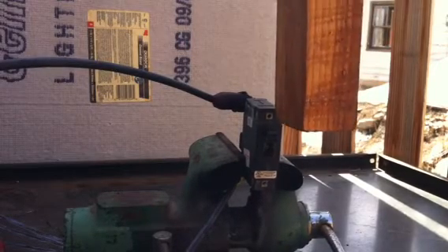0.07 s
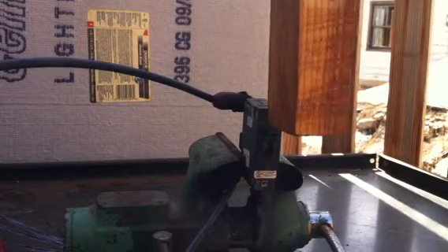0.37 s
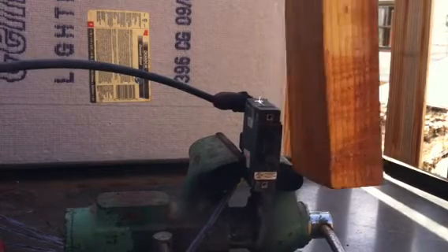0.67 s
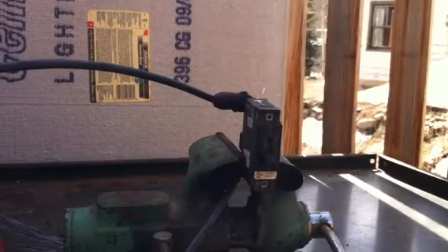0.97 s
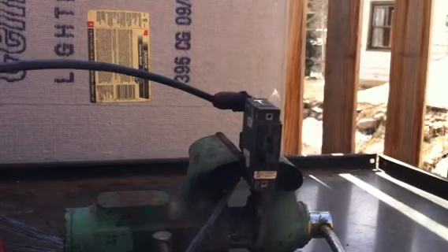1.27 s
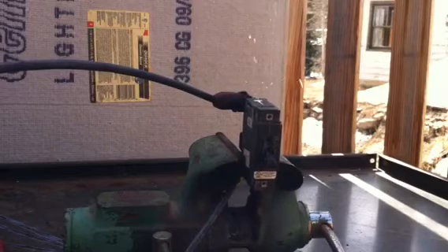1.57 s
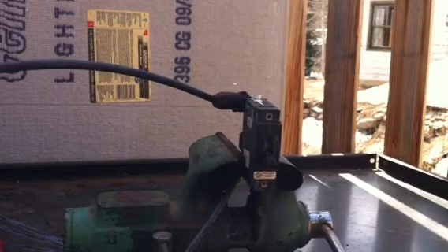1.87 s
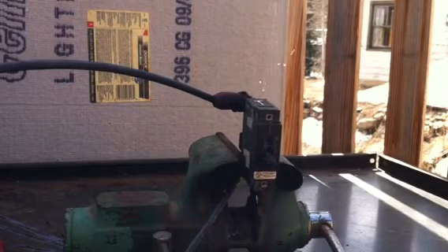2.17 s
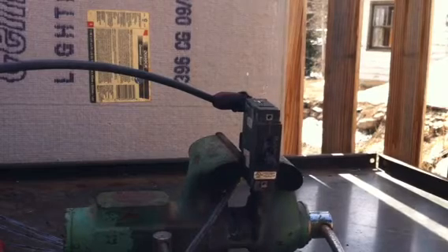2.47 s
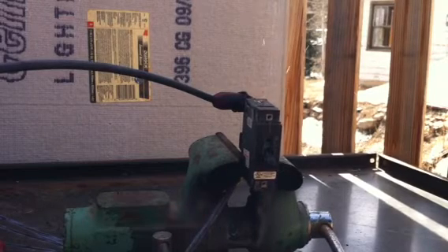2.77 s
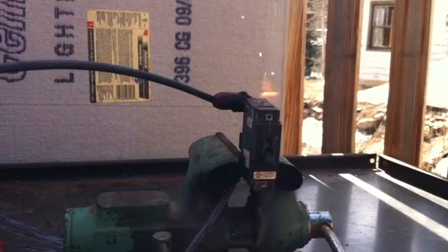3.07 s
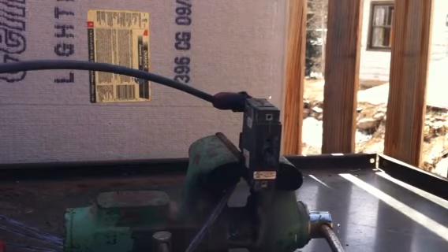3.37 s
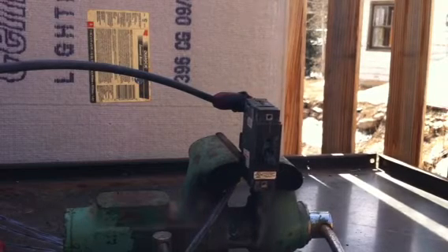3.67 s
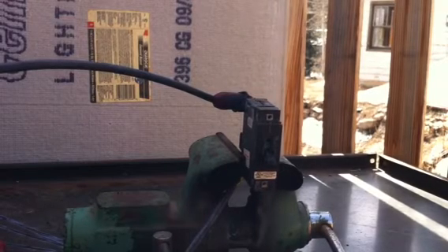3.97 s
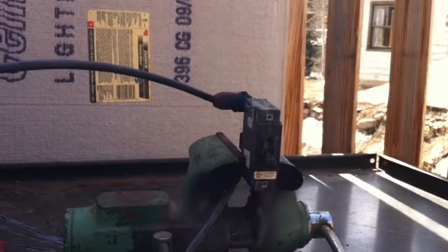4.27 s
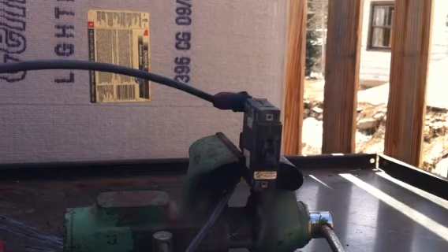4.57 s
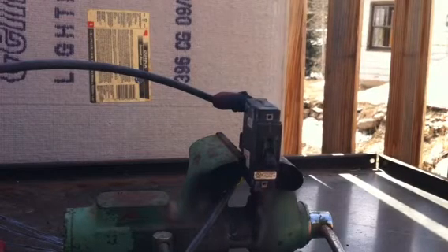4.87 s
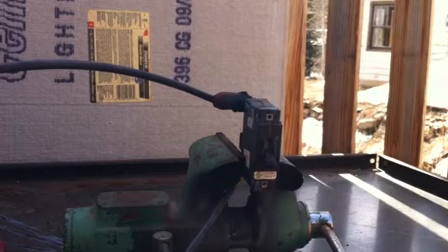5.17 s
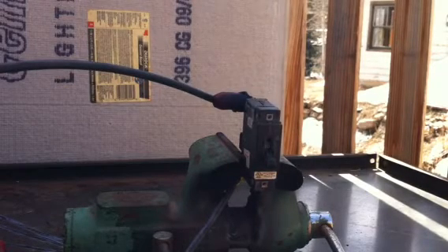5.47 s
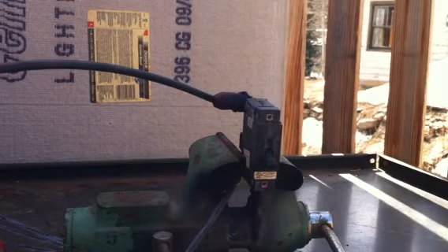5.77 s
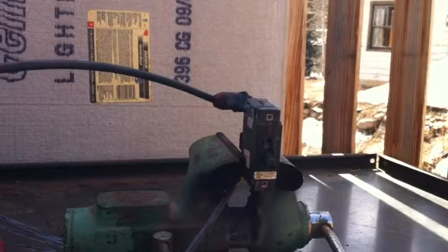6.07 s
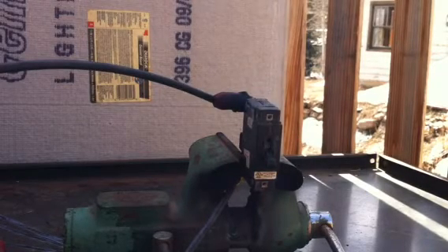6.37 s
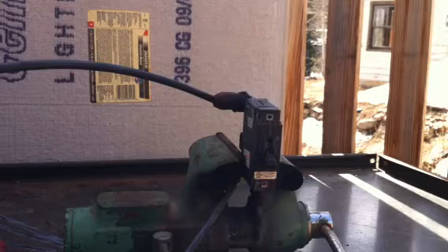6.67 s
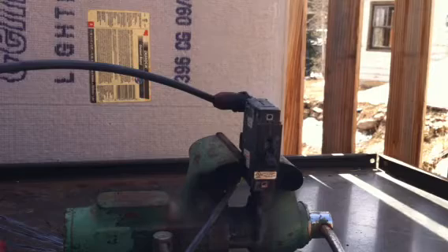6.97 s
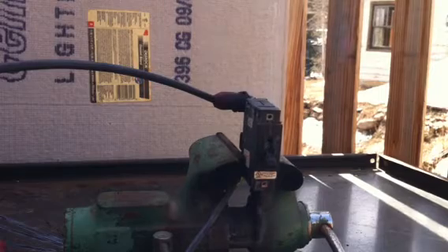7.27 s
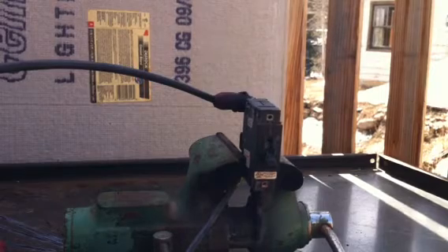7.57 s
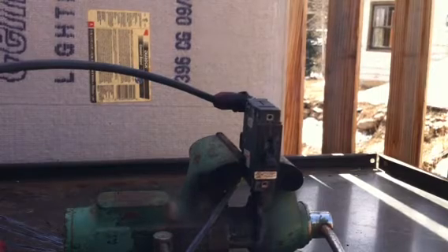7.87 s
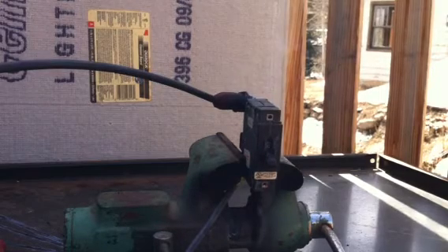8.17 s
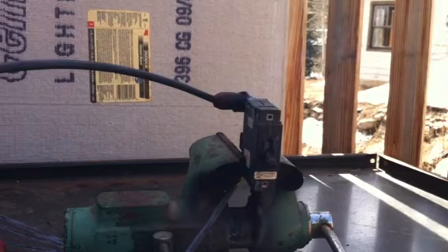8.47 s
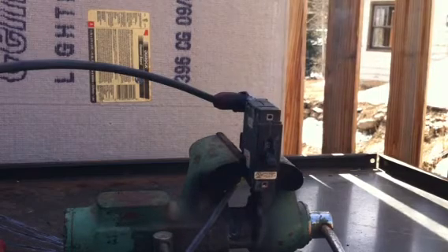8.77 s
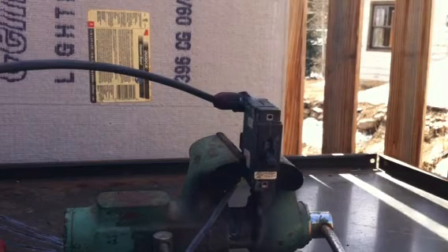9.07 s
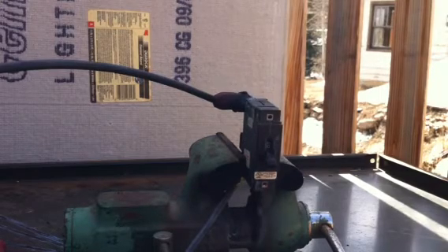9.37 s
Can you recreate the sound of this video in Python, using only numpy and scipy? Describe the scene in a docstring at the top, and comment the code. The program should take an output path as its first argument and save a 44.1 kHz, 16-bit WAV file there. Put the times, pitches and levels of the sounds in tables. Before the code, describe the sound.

An electric arc strikes inside a circuit breaker with a sharp crack and burns for a couple of seconds as a harsh, ringing hiss. It rises slightly in pitch, sputters louder and snaps out. A small puff of gas follows, then faint knocks on a workbench and a soft rustle of cloth. The sound is close, in a shed with quiet outdoor air behind it.

```python
"""On a workbench in a shed, a wooden block trips a circuit breaker and an electric arc burns inside it
for two and a half seconds. The arc's harsh hiss rings the breaker's chamber, whose pitch climbs as it
heats; the arc surges, snaps and goes out. Then come a short puff of gas, small knocks about the bench
and a soft rustle of cloth, over quiet outdoor air, far birds and a mains hum."""
import sys
import numpy as np
from scipy import signal
from scipy.fft import rfft, irfft
from scipy.io import wavfile

SR = 44100
rng = np.random.default_rng(int(sys.argv[2]) if len(sys.argv) > 2 else 0)


def put_to_file(sound):
    """Save the sound as 16-bit audio at rate SR, in the file named by the first command-line argument."""
    columns = np.atleast_2d(sound).T  # one column per channel
    safe = np.clip(columns, -1, 1)
    whole_steps = np.round(safe * 32767)
    wavfile.write(sys.argv[1], SR, whole_steps.astype(np.int16))


N = 419391
TIME = np.arange(N) / SR

ARC_ON_S, ARC_OFF_S = 0.72, 3.272
WILD_FROM_S, WILD_BY_S = 2.1, 2.8  # the contacts burn back and the arc turns unsteady
# strength of the arc between its flares (time [s], level [dB])
ARC_STRENGTH = [(0.762, -49.5), (0.79, -47.5), (1.2, -45.5), (1.272, -49), (1.342, -45), (1.4, -45.5),
                (1.48, -45.5), (2.1, -45.5), (2.46, -42), (2.53, -41.5), (2.56, -38.5), (3.25, -35.5)]
# moments when the arc nearly goes out and its hiss dips (time [s])
STALL_TIMES = [2.857, 3.024, 3.246]
# the chamber's lowest note, rising as its gas heats (time [s], pitch [Hz])
HEATED_PITCH = [(0.75, 1350), (0.95, 1385), (1.9, 1385), (2.4, 1425), (2.75, 1480), (3.06, 1570),
                (3.25, 1590)]
# notes the chamber rings at (base pitch [Hz], width [Hz], level [dB], share of the heat's rise [0-1])
CHAMBER_NOTES = [(1408, 108, 5, 0.99), (3472, 210, -0.5, 0.45), (5920, 350, -9, 0.76)]
# fixed notes of the breaker's case and the bench (pitch [Hz], width [Hz], level [dB])
CASE_NOTES = [(915, 65, -1.5), (1050, 120, -5.5), (1232, 35, 1.5), (2735, 70, -9), (2950, 60, -10),
              (3275, 70, 1)]
# tone of the arc's roar (frequency [Hz], level [dB])
ROAR_TONE = [(60, -21.5), (250, 4), (600, 3.5), (1100, 3.5), (2000, -3), (3000, 5), (4600, -7.5),
             (6500, -8), (7400, -26)]
# tone of the early sizzle (frequency [Hz], level [dB])
SIZZLE_TONE = [(3000, -38.5), (5000, -7), (5900, 7), (7400, -11.5), (8200, -1.5), (10000, -2), (11400, -3),
               (12800, 0.5), (15800, -9.5)]
# tone of the sizzle once the arc is wild (frequency [Hz], level [dB])
HOT_SIZZLE_TONE = [(3000, -3.5), (5400, -17.5), (6700, 5), (7800, -7.5), (9500, 1), (11500, 3.5),
                   (15800, 3)]
# whistles of the chamber (start [s], length [s], level [dB], pitch [Hz])
CHAMBER_WHISTLES = [(2.226, 0.036, -35.5, 1395), (2.395, 0.01, -30, 1420), (2.552, 0.014, -45, 1410),
                    (2.655, 0.025, -30, 1602), (2.697, 0.027, -30.5, 1416), (2.845, 0.091, -28, 1592),
                    (2.948, 0.014, -25.5, 1460), (3.036, 0.035, -20.5, 1570), (3.119, 0.023, -21, 1608),
                    (3.165, 0.012, -19, 1546), (3.195, 0.046, -26.5, 1630)]
# brief spits of crackle, most as the arc strikes (time [s], level [dB], fade [s])
ARC_SPITS = [(0.716, -22.5, 0.0027), (0.7209, -13, 0.0034), (0.725, -24.5, 0.0058), (0.774, -26.5, 0.011),
             (2.937, -20.5, 0.0015)]
# flares of the burning arc (start [s], length [s], level [dB])
ARC_FLARES = [(1.335, 0.029, -35.5), (1.862, 0.015, -33.5), (2.548, 0.035, -30), (2.776, 0.063, -26.5),
              (2.92, .026, -26.5), (2.97, 0.023, -23.5), (3.122, 0.035, -27.5), (3.155, 0.046, -24),
              (3.215, 0.014, -30), (3.252, 0.02, -22.5)]
# single sharp snaps (time [s], level [dB])
SHARP_SNAPS = [(0.7196, 0), (2.017, -11), (2.804, -8), (2.938, -2.5), (3.2675, 1.5), (3.8214, -23),
               (4.018, -32), (4.428, -34), (7.204, -26), (7.974, -22.5), (8.353, -20)]
# tone of spits, flares and snaps (frequency [Hz], level [dB])
SPARK_TONE = [(60, -19), (250, 2.5), (900, 7.5), (2200, 2), (3600, 4.5), (5200, 2), (7600, -0.5),
              (11000, 3), (15800, -0.5)]
# bands that cancel around the breaker (frequency [Hz], width [Hz], depth [0-1])
HOLLOW_BANDS = [(829, 40, 0.8), (1985, 220, 0.4), (2803, 73, 0.5), (4200, 69, 0.2), (4820, 110, .7),
                (7050, 140, .85), (7620, 56, 0.7)]
# pushes of hot gas (time [s], level [dB], centre [Hz], spread [octaves], fade [s])
GAS_WHUMPS = [(0.759, -33, 1050, 0.52, 0.01), (0.777, -33.5, 202, 0.53, 0.056),
              (0.798, -40, 139, 0.47, 0.14), (0.83, -37, 590, 0.98, 0.11), (2.466, -22, 270.4, 0.26, 0.012),
              (2.468, -25.5, 170, 0.19, 0.014), (2.79, -26.5, 1100, 0.66, 0.031),
              (2.934, -32, 233, 0.39, 0.0087), (2.937, -20.5, 3950, 0.18, 0.0031)]
# tone of the last puff of gas (frequency [Hz], level [dB])
PUFF_TONE = [(200, -19), (1700, -3), (2500, 7), (4000, 1), (9500, 2.5), (15800, 0)]

# knocks about the bench (time [s], level [dB], centre [Hz], spread [octaves], treble [dB])
BENCH_KNOCKS = [(0.283, -51, 370, 1.2, -20), (0.676, -53, 4030, 0.56, -4), (0.724, -36.5, 180, 0.53, -40),
                (3.812, -55, 300, 1.1, -32), (3.816, -37, 1850, 0.52, -12), (3.829, -36, 1660, 0.4, -24),
                (4.545, -53.5, 420, 0.77, -28), (4.623, -54.5, 241, 0.64, -27),
                (6.214, -50.5, 446, 1.2, -12), (6.7, -49, 420, 1.28, -20.5), (6.778, -58.5, 338, 0.15, -49),
                (6.844, -54, 422, 0.58, -41), (6.969, -48.5, 1350, 0.21, -22), (7.733, -42, 343, 0.71, -29),
                (7.765, -45, 210, 0.67, -30), (7.972, -46, 1090, .72, -15), (8.339, -37, 1100, 0.76, -15),
                (8.343, -41, 434, 1.5, -25), (8.353, -34, 13000, 0.073, -7), (8.392, -42, 3100, 0.28, -25),
                (8.516, -51.5, 1400, 0.47, -28), (9.094, -44.5, 1600, 0.26, -22)]
# soft scuffs (time [s], level [dB], treble [dB])
SOFT_SCUFFS = [(0.289, -61, -21), (3.845, -50.5, -2), (4.175, -57, -11), (5.521, -54, -21),
               (6.192, -53, -7), (6.29, -55, 1.5), (7.44, -55, -8), (8.82, -50, -11)]
# notes of the bench when knocked or rubbed (pitch [Hz], width [Hz], level [dB])
BENCH_NOTES = [(317.5, 20, 9), (352, 15, 6.5), (820, 47, -12)]
# strokes of sliding cloth (peak time [s], rise [s], fall [s], low rub [dB], high swish [dB])
CLOTH_STROKES = [(4.0, 0.11, 0.38, -83.5, -66), (6.4, 0.52, 1, -68, -64.5), (7.419, 0.26, 0.45, -60, -58),
                 (7.88, 0.23, 0.35, -61, -53.5), (8.1, 0.048, 0.15, -78, -51.5),
                 (8.24, 0.28, 0.14, -81, -49), (9.04, 0.24, 0.12, -58, -48.5),
                 (9.26, 0.31, 0.088, -52, -55)]
# tone of the cloth's low rub (frequency [Hz], level [dB])
RUB_TONE = [(60, -20), (230, 3), (600, 3.5), (1050, 0.5), (2200, -6.5), (5000, -33)]
# tone of the cloth's fine swish (frequency [Hz], level [dB])
SWISH_TONE = [(80, -7.5), (200, 5.5), (1200, -0.5), (2500, -0.5), (7000, -4), (13500, -3.5)]
# tone of a snagging thread (frequency [Hz], level [dB])
SNAG_TONE = [(300, 2), (1700, 5), (3500, 4), (12000, -18)]
# the rub sticks and slips on the bench's low notes (start [s], length [s], level [dB], pitch [Hz])
BENCH_GROANS = [(9.003, 0.042, -51.5, 318.4), (9.15, 0.077, -55, 351), (9.236, 0.047, -47, 359),
                (9.315, 0.06, -61, 312)]

# tone of the outdoor air (frequency [Hz], level [dB])
AIR_TONE = [(70, -8), (170, -0.5), (320, -3), (600, -5), (1100, -9.5), (1900, -13.5), (7000, -17.5),
            (15800, -16.5)]
# calls of far birds (time [s], level [dB], pitch [Hz])
BIRD_PIPS = [(0.4, -71, 2230), (4.035, -67.5, 2190), (4.665, -67, 2190), (5.261, -65.5, 2197),
             (5.8, -68, 5600)]
# echoes off the bench top and the wall (delay [s], gain [ratio])
CLOSE_ECHOES = [(0.00088, .12), (0.00215, .3), (0.00308, .17)]


def arc():
    """The arc's foot hops about: a flickering hiss, wilder and brighter as the contacts burn back."""
    strength_db = follow(ARC_STRENGTH)
    wild = np.interp(TIME, [WILD_FROM_S, WILD_BY_S], [0, 1])
    burning = (TIME > ARC_ON_S) & (TIME < ARC_OFF_S)
    howl = unit(chamber(crackle(grain_db=2.5), waver_db=2.5)) * amp(strength_db + 5 + 2 * wild)
    case = amp(1.5) * unit(ring(crackle(grain_db=3), CASE_NOTES))
    roar = colour(crackle(grain_db=3.5), ROAR_TONE)
    grains = crackle(grain_db=3.5)
    sizzle = (1 - wild) * amp(0.3) * colour(grains, SIZZLE_TONE)
    sizzle += wild * amp(1.5) * colour(grains, HOT_SIZZLE_TONE)
    sputter_db = (0.4 + 1.7 * wild) * wander(rate=160)
    stall_db = -10 * sum(np.exp(-((TIME - s) / 0.012) ** 2) for s in STALL_TIMES)
    hiss = (case + roar) * amp(-5.5 * wild) + sizzle
    hiss *= amp(strength_db + 2.5 + sputter_db + stall_db)
    flicker_db = (1 + .5 * wild) * wander(rate=160)
    return (howl + hiss) * amp(flicker_db) * burning


def chamber(x, waver_db=0):
    """The chamber rings like a short pipe: hot gas raises its notes and swirling gas shakes them."""
    lowest_hz = follow(HEATED_PITCH) * (1 + .007 * wander(rate=70))
    rise = lowest_hz / CHAMBER_NOTES[0][0]
    out = np.zeros(N)
    for base_hz, width, db, share in CHAMBER_NOTES:
        hz = base_hz * rise ** share
        level = amp(db + waver_db * np.tanh(wander(rate=55)))  # wavers as the arc's foot hops
        out += level * resonate(resonate(x, hz, 2 * width), hz, 2 * width)
    return out


def whistles():
    """The hot chamber breaks into short whistles."""
    return tones(CHAMBER_WHISTLES, rise=0.016, fall=0.0068, quiver_hz=24.18)


def sparks():
    """Brief spits, longer flares of crackle and single snaps; the flares also ring the hot chamber."""
    spits = sum(amp(db) * swell(TIME - s, fade) for s, db, fade in ARC_SPITS)
    flares, snaps = np.zeros(N), np.zeros(N)
    for s, length, db in ARC_FLARES:
        add(flares, s, amp(db) * gate(TIME[:SR // 4], length, rise=0.0045, fall=0.0015))
    flares *= amp(0.75 * wander(rate=160))
    for s, db in SHARP_SNAPS:
        add(snaps, s, -amp([db]))
    grains = crackle(grain_db=0.5)
    crack = colour(amp(-3) * (spits + flares) * grains + snaps, SPARK_TONE)
    sizzle = amp(-6.5) * colour(spits * rng.standard_normal(N), SIZZLE_TONE)
    return crack + sizzle + amp(11) * chamber(flares * grains)


def whumps():
    """Hot gas leaves the breaker in short pushes, most of them low and dull."""
    out = np.zeros(N)
    for row in GAS_WHUMPS:
        add(out, *burst(*row))
    return out


def puff():
    """The last spit of gas makes one short, bright hiss."""
    level = amp(-31.5) * gate(TIME - 3.871, length=0.019, rise=0.0027, fall=0.0051)
    return level * colour(rng.standard_normal(N), PUFF_TONE)


def knocks():
    """Short knocks and soft scuffs both make the bench ring."""
    out = np.zeros(N)
    for s, db, centre_hz, spread, treble_db in BENCH_KNOCKS:
        fade = 0.0061 * (1000 / centre_hz) ** 0.64  # higher knocks die faster
        add(out, *burst(s, db, centre_hz, spread, fade, treble=amp(treble_db)))
    for s, db, treble_db in SOFT_SCUFFS:
        add(out, *burst(s, db, centre_hz=583, spread=1.3, fade=0.017, treble=amp(treble_db)))
    return out + amp(-6.5) * ring(out, BENCH_NOTES)


def rustle():
    """Sliding cloth: an uneven rub that rings the bench, with a few groans, snags and a fine swish."""
    rub_level, swish_level = strokes()
    rub = colour(crackle(grain_db=3.5), RUB_TONE) * rub_level * amp(0.19 * wander(rate=25))
    groans = tones(BENCH_GROANS, rise=0.022, fall=0.04, quiver_hz=22)
    swish = colour(crackle(grain_db=1.25), SWISH_TONE) * swish_level * amp(wander(rate=47))
    snags = rng.laplace(size=N) * (rng.random(N) < 35 / SR)  # about 35 threads catch each second
    ticks = colour(snags, SNAG_TONE) * rub_level * amp(14)
    return rub + 0.18 * ring(rub, BENCH_NOTES) + groans + swish + ticks


def strokes():
    """Levels of rub and swish: each stroke of the cloth speeds up and slows again."""
    power = np.zeros((2, N))
    for s, rise, fall, rub_db, swish_db in CLOTH_STROKES:
        from_peak = np.maximum((s - TIME) / rise, (TIME - s) / fall)
        speed = np.exp(-abs(from_peak) ** 0.9)  # a pointed peak; 2 would give a bell shape
        power += (amp([[rub_db], [swish_db]]) * speed) ** 2
    return np.sqrt(power)


def outdoors():
    """Quiet air, a mains hum and the thin pips of birds far away."""
    air = amp(-66 + .4 * wander(rate=22)) * colour(rng.standard_normal(N), AIR_TONE)
    hum = amp(-75) * np.sin(2 * np.pi * 120 * TIME)
    return air + hum + sum(bird_pip(*row) for row in BIRD_PIPS)


def bird_pip(s, db, hz):
    """One short bird call; the higher it is, the more it buzzes."""
    width = 31 * (hz / BIRD_PIPS[0][2]) ** 4
    buzz = unit(resonate(resonate(rng.standard_normal(N), hz, width), hz, width))
    return amp(db) * np.exp(-((TIME - s) / 0.018) ** 2) * buzz


def hollow(x):
    """Narrow bands cancel where the arc's sound meets its own echoes."""
    for hz, width, depth in HOLLOW_BANDS:
        x = x - depth * resonate(x, hz, width)
    return x


def echo_tail(x, fade_s, size=32768):
    """Scattered echoes that start 3 ms late and fall by 60 dB in `fade_s`."""
    t = TIME[:size]
    echoes = rng.standard_normal(size) * (rng.random(size) < .1) * (t > .003)
    echoes *= amp(-60 * t / fade_s)
    return signal.oaconvolve(x, echoes / np.linalg.norm(echoes))[:N]


def tones(rows, rise, fall, quiver_hz):
    """Brief quivering tones, each on its own pitch."""
    quiver = 2 * np.pi * np.cumsum(quiver_hz * wander(rate=440)) / SR
    out = np.zeros(N)
    for s, length, db, hz in rows:
        phase = quiver[round(s * SR):][:SR // 4]
        t = TIME[:len(phase)]
        tone = np.sqrt(2) * np.sin(2 * np.pi * hz * t + phase)
        add(out, s, amp(db) * gate(t, length, rise, fall) * tone)
    return out


def burst(s, db, centre_hz, spread, fade, treble=0, size=32768):
    """Start time and sound of a short, grainy burst in one band, with optional treble on top."""
    t = TIME[:size] - .05
    hz = np.fft.rfftfreq(size, 1 / SR) + 1
    off_centre = abs(np.log2(hz / centre_hz) / spread)
    band = np.exp(-off_centre ** 3 / 4) + treble * hz / (hz + 800)
    level = swell(t, fade)
    grains = irfft(rfft(rng.laplace(size=size) * level) * band)
    return s + t[0], amp(db) * unit(grains) * np.sqrt(np.mean(level ** 2))


def crackle(grain_db):
    """Noise of tiny sparks or slips, each of its own random size."""
    return unit(rng.standard_normal(N) * amp(grain_db * wander(rate=3000)))


def ring(x, notes):
    """Lets a sound ring an object's fixed notes."""
    return sum(amp(db) * resonate(x, hz, width) for hz, width, db in notes)


def resonate(x, hz, width):
    """Keeps a narrow band of a sound, ringing at a pitch that may move."""
    turn = np.exp(2j * np.pi * np.cumsum(hz * np.ones(N)) / SR)
    feedback = np.exp(-np.pi * width / SR)
    return 2 * (turn * signal.lfilter([1 - feedback], [1, -feedback], x / turn + 1e-18)).real


def colour(x, tone, size=4096):
    """Shapes a sound with a tone table; plain noise keeps its overall level."""
    hz, db = np.transpose(tone)
    log_hz = np.log(abs(np.fft.fftfreq(size, 1 / SR)) + 1)
    log_gain = np.log(amp(np.interp(log_hz, np.log(hz), db)))
    response = np.exp(np.conj(signal.hilbert(log_gain)))  # rings only after a click, never before
    taps = np.fft.ifft(response).real[:size // 2]
    return signal.oaconvolve(x, taps / np.linalg.norm(taps))[:len(x)]


def swell(t, fade):
    """A level that rises quickly to t = 0 and then dies away."""
    rise = min(0.34 * fade, .005)
    return np.exp(-.5 * (np.minimum(t, 0) / rise) ** 2 - np.maximum(t, 0) / fade)


def gate(t, length, rise, fall):
    """A level that rises from t = 0, holds until `length` and then dies away."""
    return np.clip(t / rise, 0, 1) * np.exp(-np.maximum(t - length, 0) / fall)


def wander(rate):
    """Random drift of about size one, with `rate` turns a second."""
    return unit(np.interp(TIME * rate, np.arange(N), rng.standard_normal(N)))


def follow(rows):
    """Joins (time, value) points with straight lines."""
    return np.interp(TIME, *np.transpose(rows))


def add(mix, s, sound):
    """Adds a sound into the mix at time s."""
    part = mix[round(s * SR):][:len(sound)]
    part += sound[:len(part)]


def amp(db):
    """Turns decibels into a gain."""
    return 10 ** (np.asarray(db) / 20)


def unit(x):
    """Scales a signal to an average power of one."""
    return x / np.sqrt(np.mean(x ** 2) + 1e-20)


def scene():
    """Breaker and knocks echo off the bench, shed and yard; cloth and outdoor sounds stay dry."""
    near = hollow(arc() + whistles() + sparks()) + whumps() + knocks() + puff()
    close = near + sum(gain * np.pad(near, (round(s * SR), 0))[:N] for s, gain in CLOSE_ECHOES)
    # the shed's echoes slowly sway between two tails, so their colour keeps shifting
    turn = 2 * np.pi * 1.5 * TIME + .6 * wander(rate=6)
    shed = echo_tail(near * np.cos(turn), fade_s=0.075) + echo_tail(near * np.sin(turn), fade_s=0.05)
    yard = echo_tail(near, fade_s=.7)
    return (amp(-1.46) * close + amp(-8.5) * shed + amp(-44) * yard + rustle() + outdoors())[None]


def record(dry):
    """Trims the bass below 95 Hz and the treble above 15900 Hz."""
    thin = signal.sosfilt(signal.butter(3, 95, "high", fs=SR, output="sos"), dry)
    treble_cut = signal.firwin(511, 15900, window=("kaiser", 9), fs=SR)
    return signal.oaconvolve(thin, treble_cut[None], "same")


dry = scene()
out = record(dry)
put_to_file(out)
```